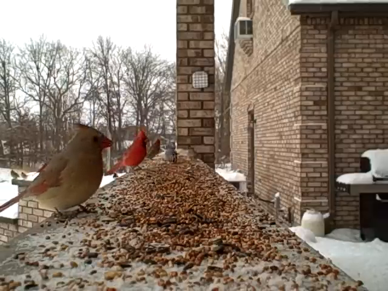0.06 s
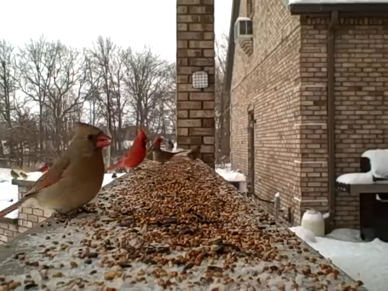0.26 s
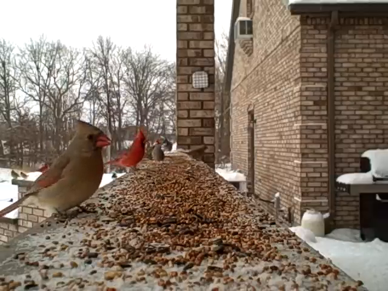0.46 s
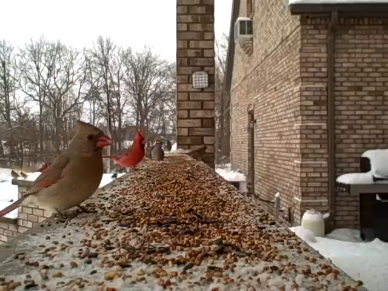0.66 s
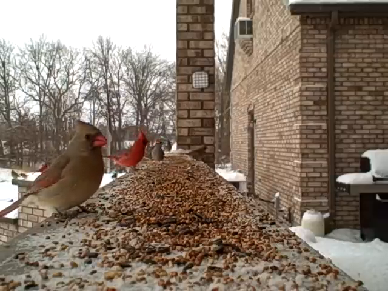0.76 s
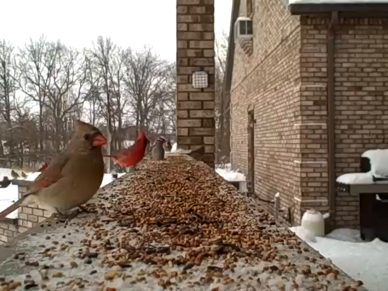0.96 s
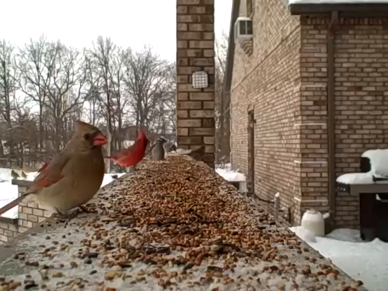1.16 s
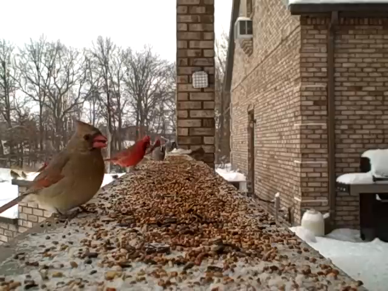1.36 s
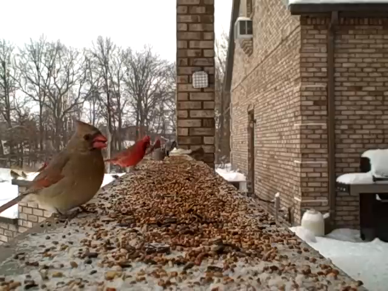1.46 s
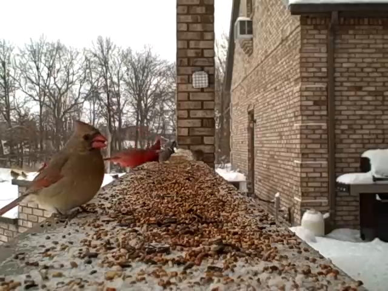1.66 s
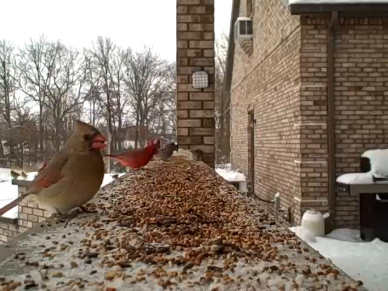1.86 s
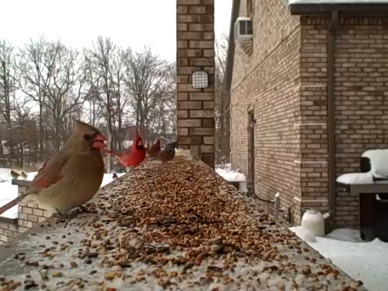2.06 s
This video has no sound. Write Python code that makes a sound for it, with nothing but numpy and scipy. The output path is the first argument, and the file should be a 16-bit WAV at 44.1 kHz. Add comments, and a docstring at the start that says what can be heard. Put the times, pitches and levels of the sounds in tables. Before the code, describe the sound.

Birds pecking and cracking seed very close up, sharp dry clicks, one brief thumping wing flutter

```python
"""Faint garden rumble and hiss, then small birds crack and peck seed on a stone ledge beside the microphone.
Clicks are snapped-husk filters struck once, with a rattle, an echo from the window behind and a yard decay.
Loose seed shifts underfoot: showers of tiny random impacts.
One bird flutters: feathers hiss as dense grains, wing air thumps the microphone as low noise bursts.
Faint chirps, gliding whistles with an octave and an echo, sound over the quiet winter garden."""
import sys
import numpy as np
from scipy import signal
from scipy.fft import rfft, irfft
from scipy.io import wavfile

SR = 44100
rng = np.random.default_rng(int(sys.argv[2]) if len(sys.argv) > 2 else 0)


def int16_out(signal):
    """Quantize to a 16-bit WAV file."""
    q = np.round(np.clip(np.atleast_2d(signal).T, -1, 1) * 32767)
    wavfile.write(sys.argv[1], SR, q.astype(np.int16))


N = 92610
TIME_S = np.arange(N) / SR
HISS_TOP_HZ = 15850  # upper limit of noise and grains
GRAIN_LOW_HZ = 2000  # lower edge of faint ticks and seed grains


def undb(db):
    """Decibels to gain."""
    return 10 ** (np.asarray(db) / 20)


def unit(x):
    """Scale to rms 1."""
    return x / np.sqrt(np.mean(x ** 2) + 1e-30)


def freqs(size):
    """Bin frequencies in Hz, floored at 1 Hz."""
    return np.maximum(np.fft.rfftfreq(size, 1 / SR), 1)


def colour(points):
    """Gain over log frequency through (Hz, dB) points."""
    hz, db = np.array(points).T
    return undb(np.interp(np.log(freqs(N)), np.log(hz), db))


def band_limit(x, gain):
    """Filter by a gain, cut at the hiss limit, scale to rms 1."""
    return unit(irfft(rfft(x) * gain * (freqs(N) < HISS_TOP_HZ), N))


def noise(gain):
    """Gaussian noise of rms 1 with the given spectrum."""
    return band_limit(rng.standard_normal(N), gain)


def grains(spread_db, gain):
    """Dense stream of tiny impacts of uneven size, rms 1."""
    struck = rng.random(N) < .1  # share of samples struck
    size_db = spread_db * np.minimum(rng.exponential(size=N), 4)
    hits = rng.standard_normal(N) * struck * undb(size_db)
    return band_limit(hits, gain)


def swell(at_s, sigma_s):
    """Gaussian rise and fall, peak 1."""
    return np.exp(-.5 * ((TIME_S - at_s) / sigma_s) ** 2)


def fade(t_s, t60_s):
    """Exponential decay by 60 dB in t60_s."""
    return np.exp(-np.log(1000) * t_s / t60_s)


def tail(x, t60_s, gain):
    """Diffuse decay: convolution with fading noise of energy 1."""
    ring = noise(gain) * fade(TIME_S, t60_s)
    return signal.fftconvolve(x, unit(ring) / np.sqrt(N))[:N]


def causal(gain):
    """Minimum-phase spectrum: folding the cepstrum makes the filter ring only after it is struck."""
    cepstrum = irfft(np.log(gain + 1e-9))
    half = len(cepstrum) // 2
    cepstrum[1:half] *= 2
    cepstrum[half + 1:] = 0
    return np.exp(rfft(cepstrum))


def add(out, at_s, x):
    """Mix a short sound in at a time."""
    i = int(np.clip(at_s * SR, 0, N - 1))
    out[i:i + len(x)] += x[:N - i]


# garden spectrum: hz [Hz], relative_db [dB per Hz]
GARDEN_COLOUR = [(12, -4), (20, 4.5), (274, -0.5), (452, -6), (614, -6), (1980, -21), (2210, -18.5),
                 (3450, -21.5), (3850, -20.5), (5090, -23), (8170, -23.5), (12800, -20), (15500, -20)]
GARDEN_RMS_DB = -57


def garden():
    """Steady far rumble and faint hiss: noise with a fixed spectrum."""
    return undb(GARDEN_RMS_DB) * noise(colour(GARDEN_COLOUR))


HUSK_T60_S, HUSK_DB, HUSK_LAG_S = 0.0023, -3.5, .0003  # rattle after the snap


def husk(f_hz, ring_hz, half_width_hz, knock_db, low_hz):
    """Husk gain: broad treble ring plus flat knock, both fading below a lower edge."""
    ring = 1 / (1 + ((f_hz - ring_hz) / half_width_hz) ** 2)
    low_cut = np.hypot(1, (low_hz / f_hz) ** 2)
    return np.hypot(ring, undb(knock_db)) / low_cut + 1e-4


def snap(ring_hz, half_width_hz, knock_db, low_hz, size=2048):
    """Husk filter struck once, peak 1, plus a brief decaying noise rattle on top."""
    gain = husk(freqs(size), ring_hz, half_width_hz, knock_db, low_hz)
    spectrum = causal(gain)
    t_s = np.arange(size) / SR
    rattle = rng.standard_normal(size) * (t_s > HUSK_LAG_S) * fade(t_s, HUSK_T60_S)
    rattle = unit(rattle) / np.sqrt(size)  # energy 1
    rattling = spectrum * (1 + undb(HUSK_DB) * np.sqrt(gain) * rfft(rattle))
    return irfft(rattling) / np.abs(irfft(spectrum)).max()


# beak and husk clicks: start_s [s], peak_db before rattle [dB], ring_hz [Hz], ring_half_width_hz [Hz], knock_db
# re ring [dB], low_hz lower edge [Hz]; the 1.072 s row thickens the window echo of the loud 1.0606 s click
BEAK_CLICKS = [(.0585, -37, 12840, 3480, -8, 1500), (.0700, -31.5, 12000, 3520, -6, 1490),
               (.2200, -8, 12900, 1770, -19.5, 3530), (0.3711, -27, 12100, 4000, 1, 2960),
               (0.4188, -27.5, 11000, 3960, 10, 2960), (.5157, -41, 13200, 2200, -16, 2000),
               (0.5444, -35.5, 11000, 2500, 5, 2500), (.5595, -44, 13000, 2000, -13, 2000),
               (0.5975, -32.5, 13100, 2200, -18, 2000), (.6188, -42, 12900, 2200, -22, 2000),
               (.6260, -41, 11500, 2000, -16, 2000), (0.6525, -41, 11400, 1900, -24, 2000),
               (.6640, -30, 11900, 1700, -18, 2500), (.6664, -25, 11600, 1790, -21.5, 2500),
               (.6703, -31.5, 11500, 1400, -34, 2500), (.7117, -43.5, 12500, 1800, -24, 2000),
               (0.8254, -34.5, 13600, 2700, -28, 3000), (.8364, -37, 12600, 2650, -10, 2000),
               (0.8542, -26, 12400, 2090, -16.5, 1200), (0.8621, -28.5, 13400, 2200, -27, 3000),
               (.9539, -18, 11700, 1610, -26, 696), (0.9697, -29, 11500, 1800, -20, 2000),
               (1.0034, -48, 11100, 1500, -22, 2000), (1.02, -34, 11200, 1400, -29, 2000),
               (1.0606, -5.5, 11940, 1800, -14.5, 120), (1.072, -19, 11000, 1500, -38, 1000),
               (1.0754, -30, 11600, 1800, -27, 2000), (1.2462, -42.5, 13400, 1600, -26, 2000),
               (1.3532, -24.5, 13000, 3200, -11, 2500), (1.358, -29, 12500, 2000, -23, 2500),
               (1.3630, -19.5, 12800, 2600, -11, 2200), (1.4109, -9.5, 11450, 2370, -13.5, 3200),
               (1.4160, -4.5, 12400, 2180, -8.5, 150), (1.7054, -31.5, 12300, 2000, -31, 2000),
               (1.7253, -31.5, 10000, 3000, -1, 2500), (1.7280, -22.5, 12500, 2300, -4, 3300),
               (1.7494, -15, 13000, 2700, -22, 900), (1.9624, -41, 4000, 1200, -10, 2500),
               (1.9672, -28, 11800, 2200, -13.5, 2500)]
TICKS_PER_S, TICK_MIN_DB, TICK_SPREAD_DB = 14, -52, 6


def beaks():
    """Near beaks snap husks at set times; birds further along the ledge tick faintly at random."""
    out = np.zeros(N)
    for start_s, peak_db, ring_hz, half_width_hz, knock_db, low_hz in BEAK_CLICKS:
        add(out, start_s, undb(peak_db) * snap(ring_hz, half_width_hz, knock_db, low_hz))
    for when, size, pitch in rng.random((int(TICKS_PER_S * N / SR), 3)):
        tick = snap(10500 + 3000 * pitch, half_width_hz=2200, knock_db=-22, low_hz=GRAIN_LOW_HZ)
        add(out, when * N / SR, undb(TICK_MIN_DB + TICK_SPREAD_DB * size) * tick)
    return out


# yard decay spectrum: hz [Hz], relative_db [dB]
YARD_TINT = [(500, -1), (3000, -3.5), (7000, -2.5), (11000, 1.5), (16000, -13)]
YARD_T60_S, YARD_DB = 0.14, -18.5
WINDOW_DELAY_S, WINDOW_DB = .0098, -24.5


def surroundings(pecks):
    """Diffuse yard decay plus one delayed copy off the window."""
    echoes = undb(YARD_DB) * tail(pecks, YARD_T60_S, colour(YARD_TINT))
    add(echoes, WINDOW_DELAY_S, undb(WINDOW_DB) * pecks)
    return echoes


# loose seed shifting: centre_s [s], sigma_s [s], level_db rms at swell peak [dB], ring_hz [Hz]
SEED_SCUFFS = [(0.063, 0.012, -59, 12500), (.419, 0.0049, -52, 9100), (0.556, 0.013, -56.5, 11500),
               (0.645, 0.0088, -55.5, 11500), (.867, 0.0072, -53.5, 14000), (.882, 0.016, -61, 13000),
               (1.311, 0.0088, -56.5, 12300), (1.368, 0.013, -51, 12200), (1.437, 0.021, -53.5, 11400),
               (1.711, 0.0052, -55, 12100), (1.735, 0.016, -68, 12500), (1.90, 0.018, -69, 11000)]
SCUFF_HALF_WIDTH_HZ, SCUFF_KNOCK_DB, SCUFF_SPREAD_DB = 1500, -15, 0.5


def loose_seed():
    """Brief showers of tiny husk-coloured grains as feet and beaks stir the pile."""
    out = np.zeros(N)
    for centre_s, sigma_s, level_db, ring_hz in SEED_SCUFFS:
        gain = husk(freqs(N), ring_hz, SCUFF_HALF_WIDTH_HZ, SCUFF_KNOCK_DB, GRAIN_LOW_HZ)
        out += undb(level_db) * swell(centre_s, sigma_s) * grains(SCUFF_SPREAD_DB, gain)
    return out


# feather rustle level: time_s [s], rms_db [dB]
FEATHER_LEVEL = [(.165, -61), (0.215, -48), (0.222, -41.5), (.27, -44.5), (.33, -47), (.42, -53),
                 (.47, -61), (.53, -71), (.70, -70)]
# feather spectrum: hz [Hz], relative_db [dB per Hz]
FEATHER_TINT = [(300, 6.5), (1200, 2.5), (2200, -6.5), (6000, -4), (9000, -5), (14000, 2), (16000, -1)]
FEATHER_CRACKLE_DB = 2.5  # spread of grain size


def feathers():
    """Feathers rustle: coloured grains follow a level curve, near silent outside it."""
    time_s, rms_db = np.array(FEATHER_LEVEL).T
    effort = undb(np.interp(TIME_S, time_s, rms_db, left=-120, right=-120))
    return effort * grains(FEATHER_CRACKLE_DB, colour(FEATHER_TINT))


# wing gusts: centre_s [s], sigma_s [s], level_db rms at swell peak [dB], upper_edge_hz [Hz]
WING_GUSTS = [(0.248, 0.0081, -14.5, 60), (0.274, 0.0085, -34.5, 400), (0.298, 0.0069, -18.5, 70),
              (0.322, 0.0059, -7, 115), (.339, 0.0058, -18, 597), (.347, 0.0073, -13, 228),
              (.364, 0.0034, -10, 357), (0.383, 0.0058, -12.5, 228), (.399, 0.0047, -20.5, 706),
              (0.42, 0.0079, -20.5, 274), (0.438, 0.0094, -21, 80), (0.465, 0.0055, -27.5, 198),
              (.482, 0.0049, -27, 280), (0.494, 0.0065, -33.5, 103), (0.534, 0.014, -40.5, 91),
              (0.602, .012, -48.5, 69.5), (0.844, .020, -51.5, 44.7)]
GUST_SLOPE_ORDER, GUST_LOW_HZ = 4.01, 9.9


def wing_gusts():
    """Air from the wings buffets the microphone: noise bursts through a causal band filter."""
    out, f_hz = np.zeros(N), freqs(N)
    for centre_s, sigma_s, level_db, upper_edge_hz in WING_GUSTS:
        shape = swell(centre_s, sigma_s)
        low_cut = f_hz ** 2 / (f_hz ** 2 + GUST_LOW_HZ ** 2)
        band = low_cut / np.hypot(1, (f_hz / upper_edge_hz) ** GUST_SLOPE_ORDER)
        eddies = irfft(rfft(shape * rng.standard_normal(N)) * causal(band), N)
        out += undb(level_db) * unit(eddies) * np.sqrt(np.mean(shape ** 2))
    return out


# chirps: centre_s [s], sigma_s [s], pitch_hz at centre [Hz], glide_hz_per_s [Hz/s],
# level_db peak of fundamental [dB], octave_db re fundamental [dB]
BIRD_CHIRPS = [(0.785, 0.0062, 5366, -9000, -55.5, 1.5), (1.815, 0.006, 4030, 20002, -67, -20)]
CHIRP_WAVER_RMS_HZ, CHIRP_WAVER_RATE_HZ = 70, 215
CHIRP_ECHO_DB, CHIRP_T60_S = -8.5, 0.27


def chirps():
    """Short gliding whistles with their octave, pitch wavering by slow noise, echoed by the house."""
    out = np.zeros(N)
    waver_hz = CHIRP_WAVER_RMS_HZ * noise(1 / (1 + (freqs(N) / CHIRP_WAVER_RATE_HZ) ** 4))
    for centre_s, sigma_s, pitch_hz, glide_hz_per_s, level_db, octave_db in BIRD_CHIRPS:
        glide_hz = glide_hz_per_s * (TIME_S - centre_s)
        phase = 2 * np.pi * np.cumsum(pitch_hz + glide_hz + waver_hz) / SR
        whistle = np.sin(phase) + undb(octave_db) * np.sin(2 * phase)
        out += undb(level_db) * swell(centre_s, sigma_s) * whistle
    return out + undb(CHIRP_ECHO_DB) * tail(out, CHIRP_T60_S, 1)


def scene():
    """Sum of all layers, one channel; only the clicks get window and yard."""
    pecks = beaks()
    mix = garden() + pecks + surroundings(pecks) + loose_seed()
    mix += feathers() + wing_gusts() + chirps()
    return mix[None]


TOP_HZ = 16350


def record(dry):
    """The recorder cuts the top steeply."""
    cut = 1 / np.hypot(1, (freqs(N) / TOP_HZ) ** 120)
    return irfft(rfft(dry) * cut, N)


dry = scene()
out = record(dry)
int16_out(out)
```